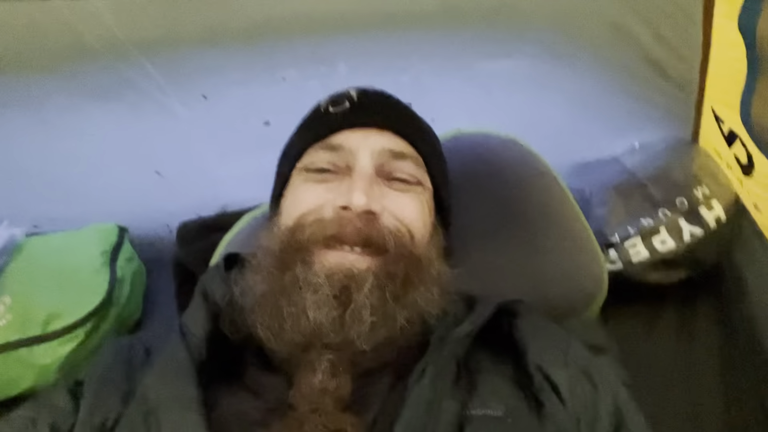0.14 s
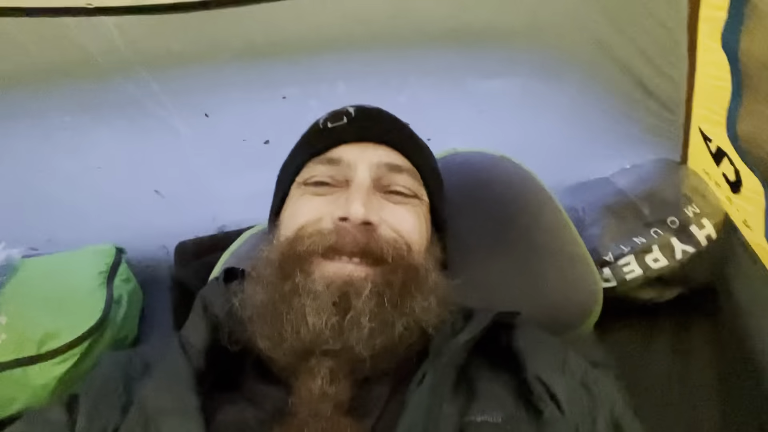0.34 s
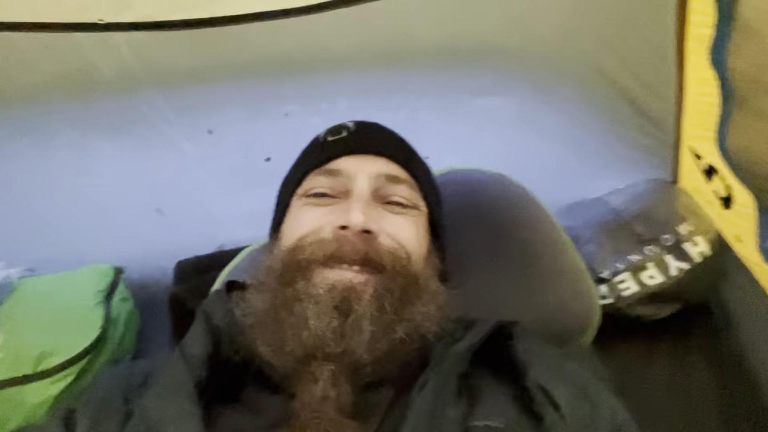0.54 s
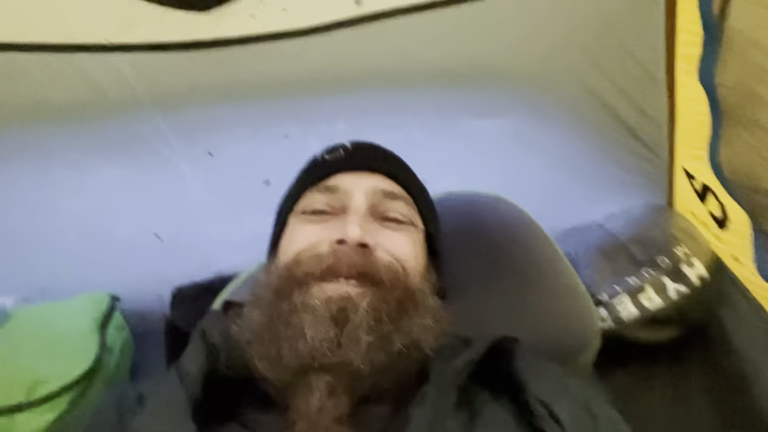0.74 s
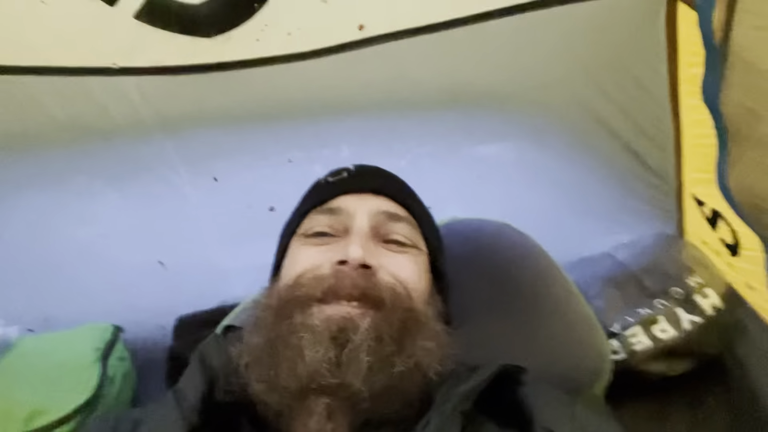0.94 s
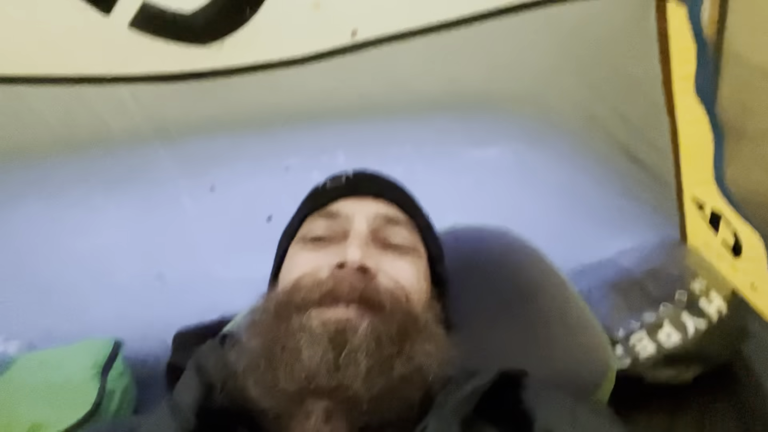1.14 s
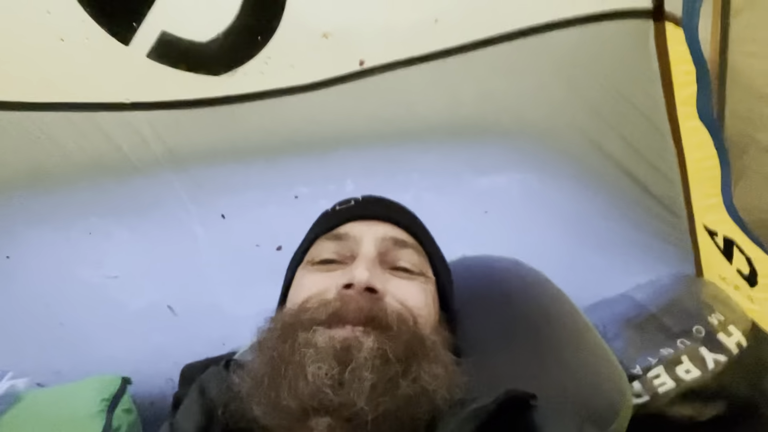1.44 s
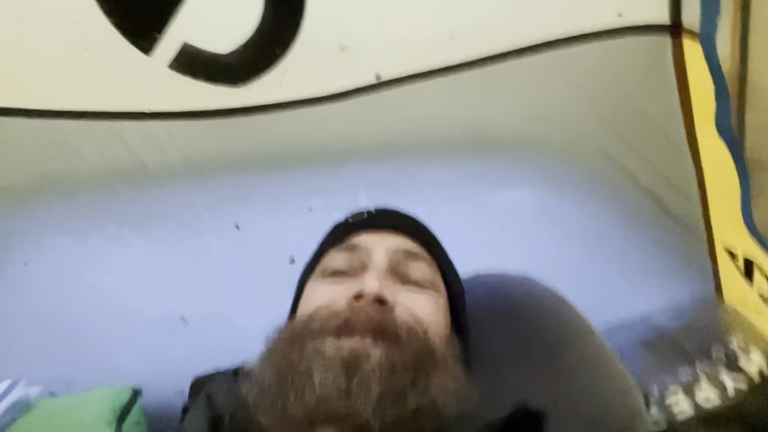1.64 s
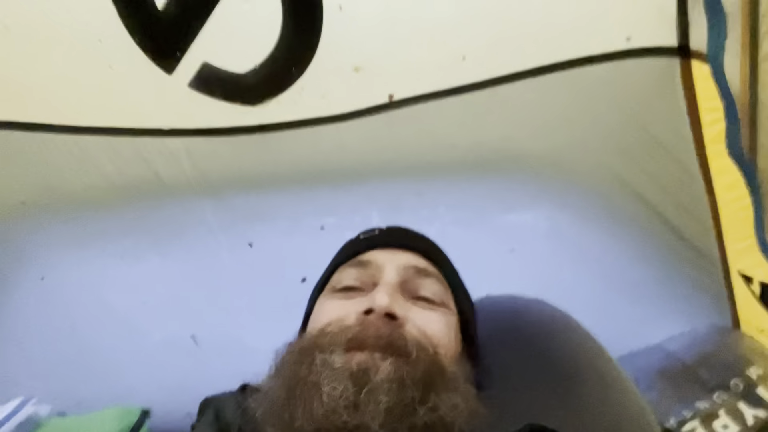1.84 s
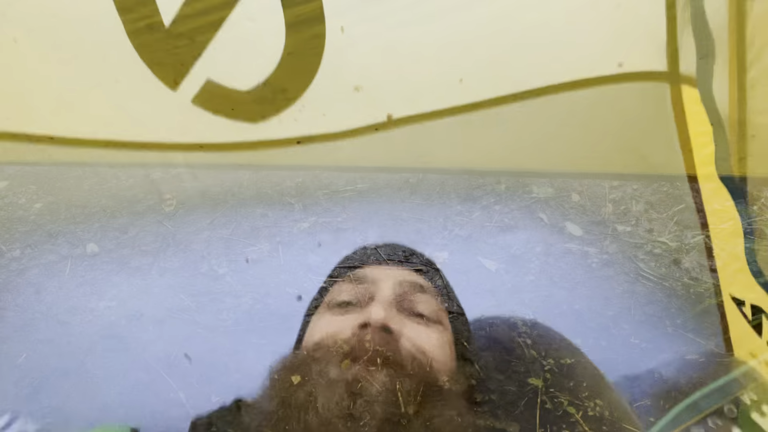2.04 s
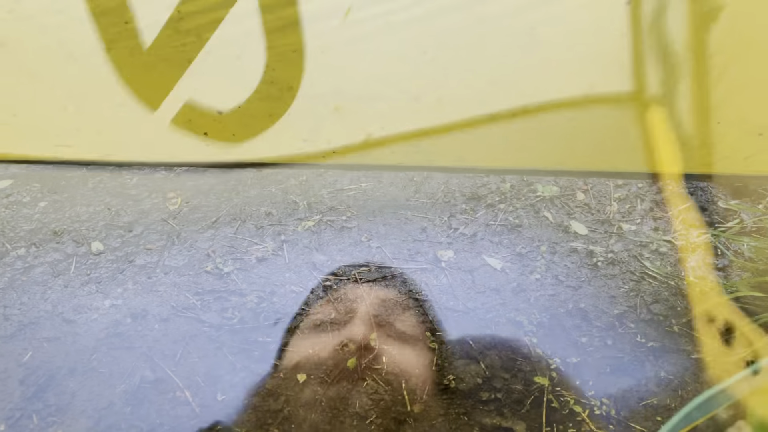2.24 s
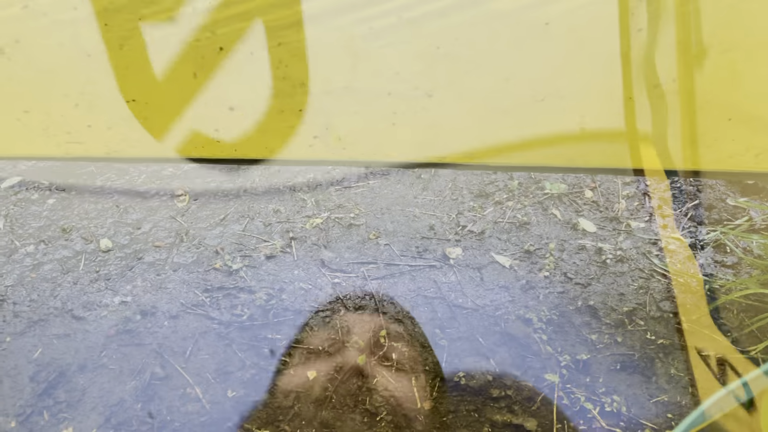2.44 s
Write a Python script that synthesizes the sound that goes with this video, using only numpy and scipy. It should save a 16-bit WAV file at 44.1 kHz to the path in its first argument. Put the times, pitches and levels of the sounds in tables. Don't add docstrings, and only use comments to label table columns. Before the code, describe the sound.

Rain pattering on taut tent fabric, heard from inside, with a few heavy drips thumping overhead

```python
import sys
import numpy as np
from scipy import signal
from scipy.fft import rfft, irfft
from scipy.io import wavfile
from scipy.ndimage import uniform_filter1d

SR = 44100
rng = np.random.default_rng(int(sys.argv[2]) if len(sys.argv) > 2 else 0)


def decibels_to_gain(level_db):
    exponent = np.asarray(level_db, float) / 20
    return 10 ** exponent


def waveform_to_disk(signal):
    frames = np.transpose(np.atleast_2d(signal))
    scaled = np.clip(frames, -1, 1) * 32767
    samples = np.round(scaled).astype(np.int16)
    wavfile.write(sys.argv[1], SR, samples)


N = 114660


def evened(x):
    return x / np.sqrt(np.mean(x ** 2) + 1e-20)


def read(points, hz):
    f, value = np.transpose(points)
    return np.interp(np.log(hz + 1), np.log(f + 1), value)


def add(mix, start_s, sound):
    part = mix[:, round(start_s * SR):][:, :sound.shape[1]]
    part += sound[:, :part.shape[1]]


def panned(pan_db):
    return decibels_to_gain(np.array([[pan_db / 2], [-pan_db / 2]]))


# time_s, level_db
SHOWER = [(0, -46), (.5, -46), (.68, -46), (.74, -47), (.9, -45), (1.16, -46), (1.55, -45.5), (1.8, -45),
          (1.94, -46), (1.98, -47.5), (2.07, -48), (2.2, -48), (2.33, -48), (2.37, -45), (2.45, -46),
          (2.53, -43.5), (2.6, -41)]


def shower_db():
    return np.interp(np.arange(N) / SR, *np.transpose(SHOWER))


# pitch_hz, level_db
WASH_MID = [(30, -38), (65, 0.5), (250, -0.5), (700, -7), (2000, -5.5), (5000, -14), (10000, -21.5),
            (15000, -29)]
# pitch_hz, level_db
WASH_SIDE = [(30, -57), (65, -5), (250, -8.5), (700, -5), (2000, -7), (5000, -15.5), (8000, -26),
             (15000, -28)]
WASH_DB, WASH_FOLLOW = -52, .7
PATCH_DB, FLICKER_DB = 1.8, .9


def wash():
    frames, hz = N // 128 + 5, np.fft.rfftfreq(512, 1 / SR)
    a, b, c, d, patches = rng.standard_normal((frames, 257, 5)).T
    patches = uniform_filter1d(patches, size=6, axis=0)
    patches = evened(uniform_filter1d(patches, size=16, axis=1))
    flicker = evened(uniform_filter1d(rng.standard_normal(frames), size=4))
    tone_db = np.array([read(WASH_MID, hz), read(WASH_SIDE, hz)])
    z = np.array([a + 1j * b, c + 1j * d]) * decibels_to_gain(tone_db)[:, :, None]
    z = z * decibels_to_gain(PATCH_DB * patches + FLICKER_DB * flicker)
    mid, side = signal.istft(z, nperseg=512, noverlap=384)[1][:, :N]
    swell_db = shower_db() - shower_db().mean()
    return evened(np.array([mid + side, mid - side])) * decibels_to_gain(WASH_DB + WASH_FOLLOW * swell_db)


CRACKLE_PER_S, CRACKLE_DB, CRACKLE_SPREAD_DB, SNAP_DECAY_MS = 900, -12.5, 1.5, 0.93


def tick(noise):
    return np.diff(noise) * np.exp(-np.arange(256) * 1000 / SR / SNAP_DECAY_MS)


def scattered(per_s, spread_db):
    strength = decibels_to_gain(spread_db * np.minimum(rng.exponential(1, N), 3.5))
    return strength * (rng.random(N) < per_s / SR)


def crackle(count=12):
    hits = scattered(CRACKLE_PER_S, CRACKLE_SPREAD_DB)
    spot, out = rng.integers(0, count, N), np.zeros((2, N))
    for k, noise in enumerate(rng.standard_normal((count, 2, 257))):
        out += signal.oaconvolve((hits * (spot == k))[None], tick(noise), axes=1)[:, :N]
    top = signal.butter(2, [2500, 9000], "band", fs=SR, output="sos")
    return evened(signal.sosfilt(top, out) + 0.58 * out) * decibels_to_gain(shower_db() + CRACKLE_DB)


RIPPLE_TURNS = 1.312
TAIL_MS = 40


def ripple(delay_ms, decay_ms, lag_ms):
    size = int(SR * .007 * (decay_ms + 2))
    arrival_ms = np.array([[max(-lag_ms, 0)], [max(lag_ms, 0)]])
    ms = np.arange(size) * 1000 / SR - arrival_ms
    u = np.maximum(ms, 1e-3) / delay_ms
    onset = 1 - np.exp(-(0.89 * u) ** 6.9)
    decay = np.exp(-ms / decay_ms - (ms / TAIL_MS) ** 2)
    return onset * decay * np.cos(2 * np.pi * RIPPLE_TURNS * np.log(u))


PATTER_PER_S, PATTER_DB, PATTER_SPREAD_DB, PATTER_LAG_MS = 1300, -3.5, 2.5, 0.76
CLUMP_DB = 2


def patter(count=40):
    clumps = decibels_to_gain(CLUMP_DB * evened(uniform_filter1d(rng.standard_normal(N), size=1500)))
    hits = scattered(clumps * PATTER_PER_S, PATTER_SPREAD_DB)
    spot, out = rng.integers(0, count, N), np.zeros((2, N))
    for k, (far, long, side, sign) in enumerate(rng.uniform(-0.782, 1, (count, 4))):
        delay_ms = 0.3816 * np.exp(0.75 * far)
        decay_ms = 1.066 * np.exp(.5 * long + 0.47 * far)
        sound = np.sign(sign) * panned(2.8 * side) * ripple(delay_ms, decay_ms, PATTER_LAG_MS * side)
        out += signal.oaconvolve((hits * (spot == k))[None], sound, axes=1)[:, :N]
    return evened(out) * decibels_to_gain(shower_db() + PATTER_DB)


# start_s, level_db (peak), pan_db (left minus right)
DROPS = [(0.0813, -35, 0), (0.121, -33, 1), (0.16, -34, 0), (0.1782, -35, -1), (0.3479, -35, -6),
         (0.3672, -33, -2), (0.3918, -32, -1), (0.4556, -35, -2), (0.4658, -32, 2), (0.4807, -35, -5),
         (0.5932, -30, 4), (0.6, -35, 1), (0.6078, -30, 0), (0.6187, -30, 3), (0.6328, -32, -1),
         (0.6596, -34, 2), (0.673, -34, -1), (0.7937, -33, 1), (0.8703, -34, 4), (0.9365, -35, 1),
         (0.9556, -33, -1), (0.9696, -34, -3), (0.9907, -33, 2), (1.0398, -34, 0), (1.0929, -32, 1),
         (1.1592, -34, -1), (1.1964, -32, 3), (1.2278, -33, 5), (1.2501, -34, -5), (1.2695, -32, -4),
         (1.2822, -32, 1), (1.3021, -33, 1), (1.3515, -33, -6), (1.3618, -30, -3), (1.3724, -34, -1),
         (1.425, -33, -2), (1.4374, -35, -7), (1.4986, -34, 3), (1.5122, -32, -5), (1.5336, -35, -1),
         (1.5465, -34, 5), (1.5563, -31, 0), (1.6353, -35, -1), (1.6543, -34, 0), (1.6626, -28, -2),
         (1.6995, -34, 0), (1.7103, -33, 0), (1.7399, -33, 0), (1.8835, -29, -1), (1.9051, -34, -1),
         (1.9299, -32, 2), (1.9442, -27, -8), (1.9983, -33, -1), (2.0093, -35, 1), (2.3659, -34, -8),
         (2.3781, -31, 4), (2.4006, -32, -3), (2.534, -31, 3), (2.5487, -32, -4), (2.5714, -35, -1)]
DROP_DELAY_MS, DROP_DECAY_MS, TICK_DB = 0.55, 1.3, -21.5


def drops():
    out, chance = np.zeros((2, N)), rng.uniform(-0.94, 1, (len(DROPS), 3))
    noise = rng.standard_normal((len(DROPS), 2, 257))
    for (start_s, db, pan_db), (a, b, c), snap in zip(DROPS, chance, noise):
        sound = ripple(DROP_DELAY_MS * (1 + 0.15 * a), DROP_DECAY_MS * (1 + 0.17 * b), 0.086 * c)
        snap_s = start_s + 2 * DROP_DELAY_MS / 1000
        add(out, snap_s, decibels_to_gain(db + TICK_DB) * panned(pan_db) * tick(snap))
        add(out, start_s, -decibels_to_gain(db) * panned(pan_db) * sound)
    return out


# start_s, level_db (rms before rise and decay), pitch_hz (ringing), decay_ms, pan_db (left
SPLASHES = [(0.0511, -37, 2140, 3.7, 7.5), (0.1084, -48, 2110, 8.1, 13), (0.2019, -19.5, 2900, 3.6, -6),
            (0.212, -36, 1800, 13.4, -2), (0.2315, -36.5, 2170, 5.5, 1), (0.2995, -47, 2340, 2.5, 20),
            (0.3218, -36.5, 2200, 6.4, -1), (0.3987, -40.5, 2740, 8.3, -8), (0.4095, -34.5, 2200, 5, 11),
            (0.442, -31.5, 3460, 4.9, 1), (0.545, -34.5, 3260, 4.5, 2), (0.5475, -37, 2000, 3.4, -1),
            (0.619, -34, 2360, 1.6, -7), (0.8484, -41, 4400, 13.5, 5), (0.8609, -40, 2450, 7.2, 4),
            (0.8612, -36.5, 4230, 6.3, 1), (0.9987, -38.5, 4450, 7.5, 5.5), (1.196, -44, 2280, 1.6, 8),
            (1.469, -44.5, 2200, 3.9, 8), (1.663, -36, 2550, 1.6, 1), (1.9301, -43.5, 2540, 9.8, -2.0),
            (1.9996, -44, 2140, 3.6, -5), (2.2907, -41, 1550, 8.2, -5.5), (2.433, -39.5, 3260, 8.3, 2.5),
            (2.5089, -32.5, 3250, 5.7, -1)]
# pitch_hz, level_db
SPRAY = [(100, -21), (500, 9.5), (2000, 11.5), (4000, 0), (7000, -1), (11000, -8.5), (16000, -11)]
SPRAY_SAME, SPRAY_RISE_MS = 0.42, 0.15
RING_DB, RING_Q = 7, 5


def spray():
    out, ms, hz = np.zeros((2, N)), np.arange(4096) * 1000 / SR, np.fft.rfftfreq(4096, 1 / SR)
    for start_s, db, ring_hz, decay_ms, pan_db in SPLASHES:
        common, left, right = rng.standard_normal((3, 4096))
        ring = decibels_to_gain(RING_DB) / (1 + (RING_Q * (hz / ring_hz - ring_hz / (hz + 1))) ** 2)
        colour = decibels_to_gain(read(SPRAY, hz)) + ring
        pair = SPRAY_SAME * common + (1 - SPRAY_SAME) * np.array([left, right])
        noise = evened(irfft(rfft(pair) * colour))
        envelope = (1 - np.exp(-ms / SPRAY_RISE_MS)) * np.exp(-ms / decay_ms)
        add(out, start_s, noise * decibels_to_gain(db) * panned(pan_db) * envelope)
    return out


# start_s, level_db (peak), pitch_hz, decay_ms, pan_db (left minus right)
KNOCKS = [
    (.2022, -22, 1500, 1.5, 0),
    (.4097, -30, 2250, 2.5, 3),
    (.4428, -33, 3450, 2.5, 0),
    (.5462, -27, 760, 2.6, -3),
    (.5465, -36, 3300, 3, 0),
    (1.827, -38, 650, 5, -3),
    (2.4345, -37, 3300, 2.5, 2),
    (2.513, -34, 1700, 2, 0),
]
KNOCK_RISE_MS = .5


def knocks():
    out, ms = np.zeros((2, N)), np.arange(1500) * 1000 / SR
    for start_s, db, hz, decay_ms, pan_db in KNOCKS:
        envelope = (1 - np.exp(-ms / KNOCK_RISE_MS)) * np.exp(-ms / decay_ms)
        note = envelope * np.sin(2 * np.pi * hz * ms / 1000)
        add(out, start_s, decibels_to_gain(db) * panned(pan_db) * note)
    return out


# start_s (impact), level_db (peak), delay_ms (ripple), decay_ms, pan_db (left minus right)
DRIPS = [(0.0506, -27, .95, 3, 6), (0.2014, -7.5, 1.13, 6.5, 4), (0.3213, -16, 1.01, 4, 7),
         (2.0485, -26, 2.6, 5, 2), (.2021, -9, .2, .6, -1), (.3219, -13, .22, .7, 5), (.999, -28, .8, 2, 3),
         (.9985, -30, 2.5, 9, 4), (.245, -36, 9, 30, 3), (.8605, -33, .6, 5, 2), (0.2322, -29, 2.26, 6, -4),
         (.3017, -26.5, 3.6, 6.8, 4), (.3985, -27, 0.8, 2.5, -2), (0.407, -19, 8, 9, 3),
         (0.4445, -29, 2.1, 12, 3), (.4462, -28, .8, 2, 2), (.546, -33, .95, 6, -4),
         (.862, -36, 5.4, 10, 0), (1.53, -38, 17, 40, -1), (1.7250, -46.5, 7.5, 31, 4),
         (2.417, -36, 1.9, 5, 0), (2.4336, -24, 2.84, 6.5, 3.5), (2.5101, -24, 4.5, 6, 1),
         (2.544, -41, 3.8, 14, -3)]
PORT_LAG_MS, FLUTTER = .12, .13


def drips():
    out = np.zeros((2, N))
    rough = 1 + FLUTTER * evened(uniform_filter1d(rng.standard_normal((2, N)), size=40, axis=1))
    for start_s, db, delay_ms, decay_ms, pan_db in DRIPS:
        add(out, start_s, decibels_to_gain(db) * panned(pan_db) * ripple(delay_ms, decay_ms, PORT_LAG_MS))
    return out * rough


# left_ms (delay), right_ms (delay), level_db
SEAMS = [
    (1.3, 1.58, -16),
    (2.9, 3.87, -15),
    (4.6, 4.2, -20),
    (7.5, 9.2, -16.5),
    (11.5, 12, -22.5),
]


def walls(x):
    out = x.copy()
    for left_ms, right_ms, db in SEAMS:
        add(out[:1], left_ms / 1000, decibels_to_gain(db) * x[:1])
        add(out[1:], right_ms / 1000, decibels_to_gain(db) * x[1:])
    return out


# time_s, low_hz (sum cancels), high_hz (difference returns above)
NULL = [(0, 7300, 15100), (1.6, 7450, 15100), (1.85, 7800, 14900), (2.15, 8050, 14200), (2.35, 8300, 13600),
        (2.6, 8300, 13600)]
MID_NULL_DB, MID_NULL_HZ, DEEPEN_DB_PER_S = -8.6, 800, -2.4
SIDE_NULL_FROM_HZ, SIDE_NULL_DB = 10400, -13
TOP_NULL_DB, TOP_GAP_HZ = -15, 50


def ports(pair):
    hz, t, z = signal.stft(pair, SR, nperseg=256, noverlap=192)
    when, low, high = np.transpose(NULL)
    hz, low, high = hz[:, None], np.interp(t, when, low), np.interp(t, when, high)

    def above(edge_hz):
        return .5 + .5 * np.tanh((hz - edge_hz) / 350)

    notch = np.exp(-((hz - low) / MID_NULL_HZ) ** 2)
    mid_db = (MID_NULL_DB + DEEPEN_DB_PER_S * t) * notch + TOP_NULL_DB * above(high + TOP_GAP_HZ)
    side_db = SIDE_NULL_DB * (above(SIDE_NULL_FROM_HZ) - above(high))
    z = z * decibels_to_gain(np.array([mid_db, side_db]))
    return signal.istft(z, SR, nperseg=256, noverlap=192)[1][:, :N]


OPEN_MOMENTS = [
    .053,
    .204,
    .323,
    .449,
    .59,
    .622,
    1.003,
    1.19,
    1.662,
    2.51,
]
STARVE_DB, OPEN_S, BAND_HZ = 8.5, .009, 690
EDGE_HZ, CUTOFF_HZ = 15800, 16400


def starved(pair):
    hz, t, z = signal.stft(pair, SR, nperseg=2048, noverlap=1536)
    band = (hz // BAND_HZ).astype(int)
    starts = np.flatnonzero(np.diff(band, prepend=-1))
    power = np.add.reduceat(abs(z) ** 2, starts, axis=1)[:, band]
    power = uniform_filter1d(power, size=2, axis=2)[:, :, ::2]
    power = np.repeat(power, 2, axis=2)[:, :, :len(t)]
    held_open = abs(t[:, None] - np.array(OPEN_MOMENTS)).min(axis=1) < OPEN_S
    hz = hz[:, None]
    closed = (power * decibels_to_gain(STARVE_DB) ** 2 < power[::-1]) & (hz > 6000)
    closed = closed | (hz > EDGE_HZ)
    kept = (~closed | held_open) & (hz < CUTOFF_HZ)
    return signal.istft(z * kept, SR, nperseg=2048, noverlap=1536)[1][:, :N]


def scene():
    strikes = drips() + drops() + knocks()
    return walls(strikes) + spray() + patter() + crackle() + wash()


def low_pass(x):
    return signal.sosfilt(signal.butter(12, 16470, fs=SR, output="sos"), x)


def record(dry):
    cut = signal.butter(4, 44.5, "high", fs=SR, output="sos")
    pair = np.array([dry[0] + dry[1], dry[0] - dry[1]]) / 2
    mid, side = starved(ports(signal.sosfilt(cut, pair)))
    return low_pass(np.array([mid + side, mid - side]))


dry = scene()
out = record(dry)
waveform_to_disk(out)
```